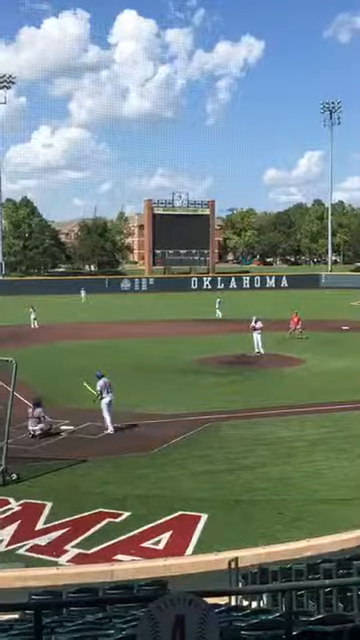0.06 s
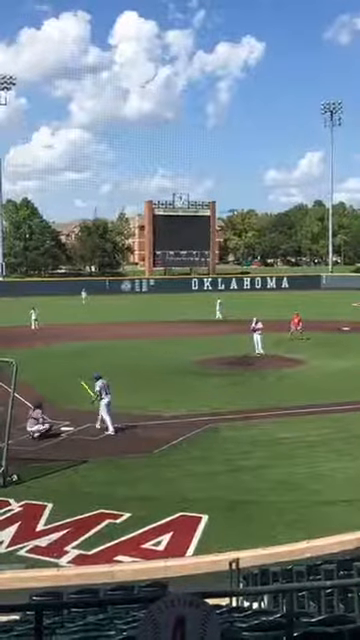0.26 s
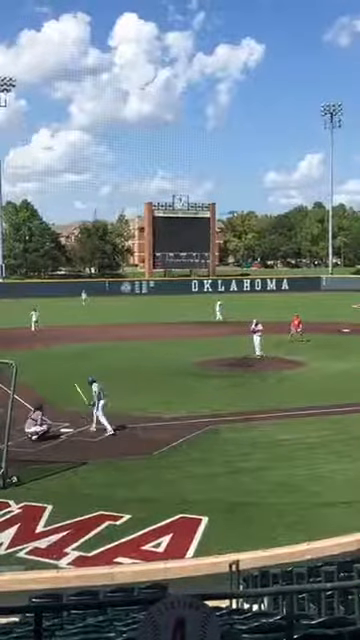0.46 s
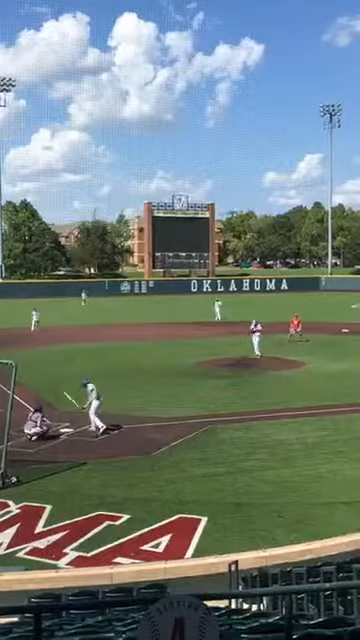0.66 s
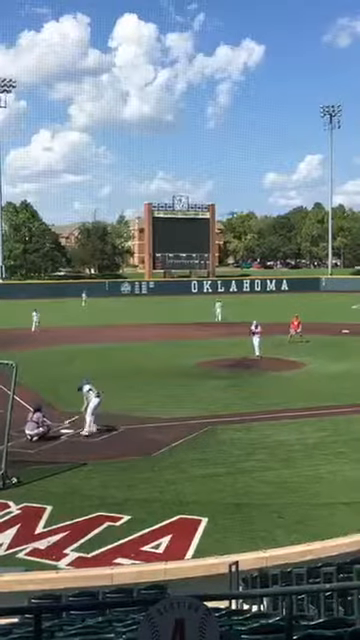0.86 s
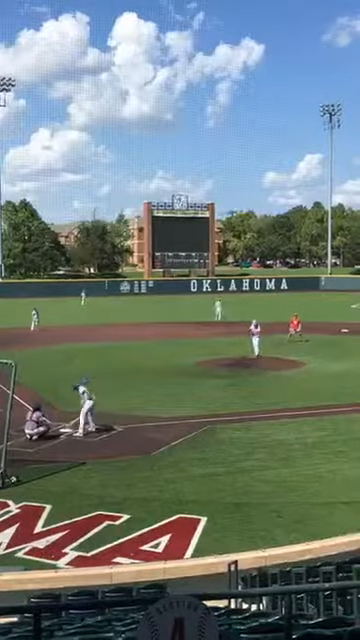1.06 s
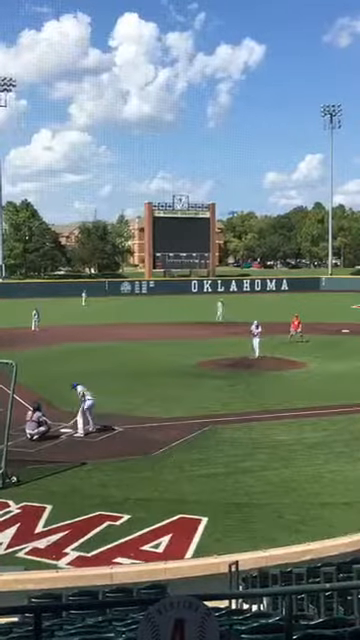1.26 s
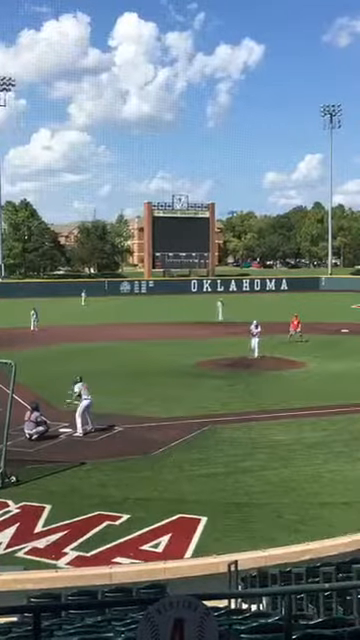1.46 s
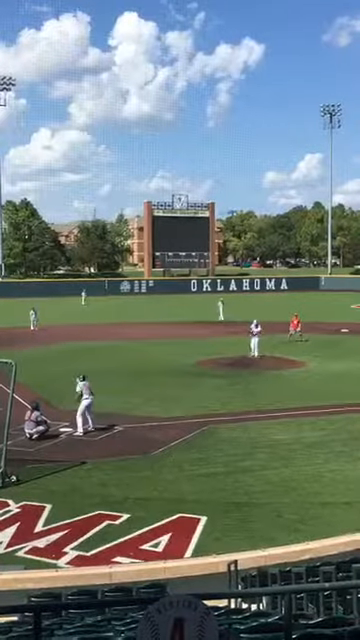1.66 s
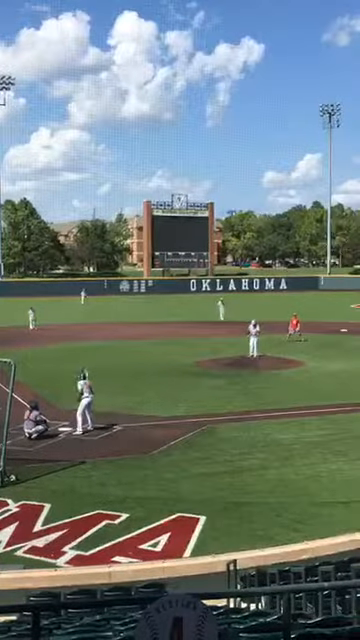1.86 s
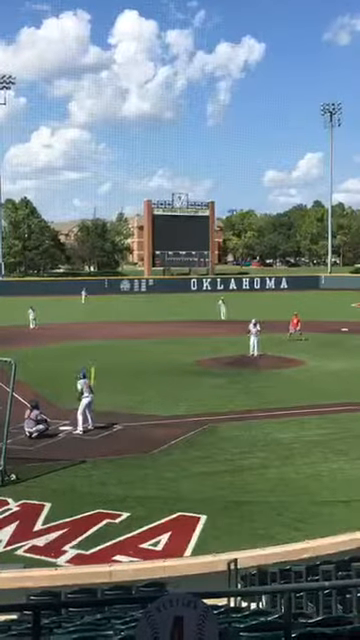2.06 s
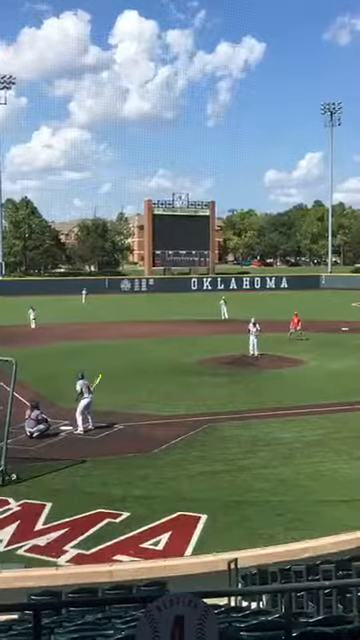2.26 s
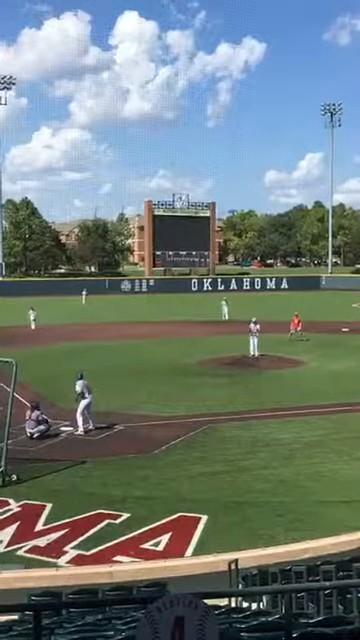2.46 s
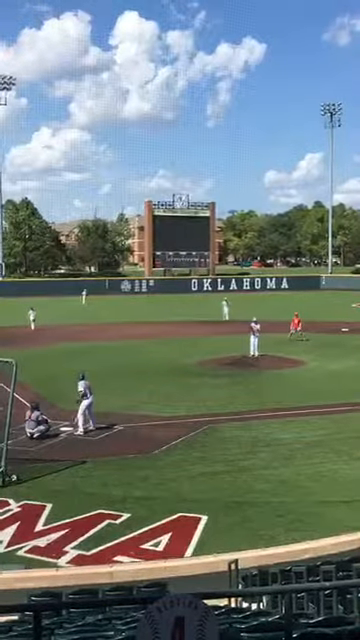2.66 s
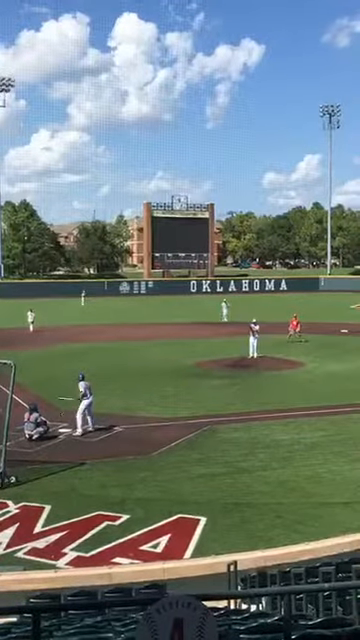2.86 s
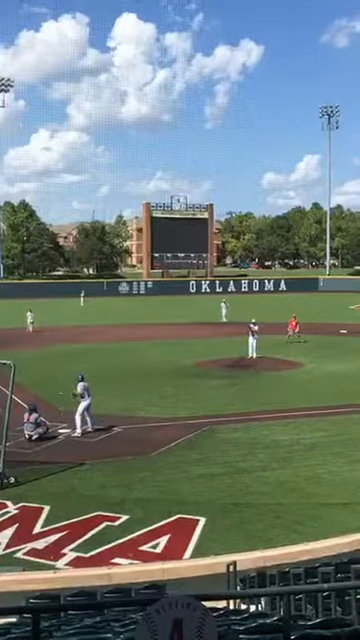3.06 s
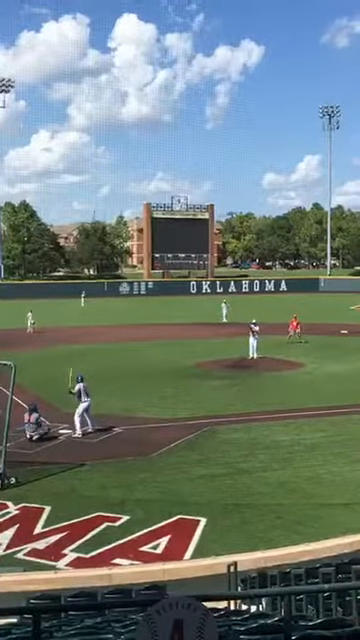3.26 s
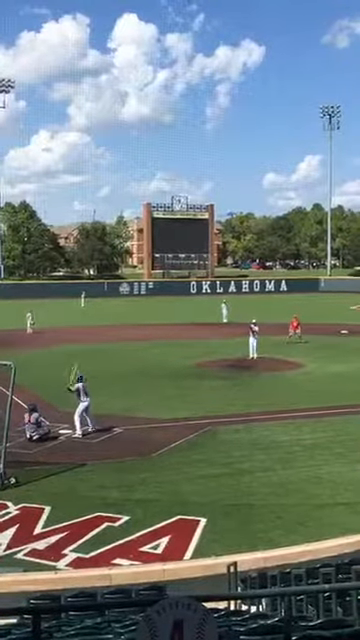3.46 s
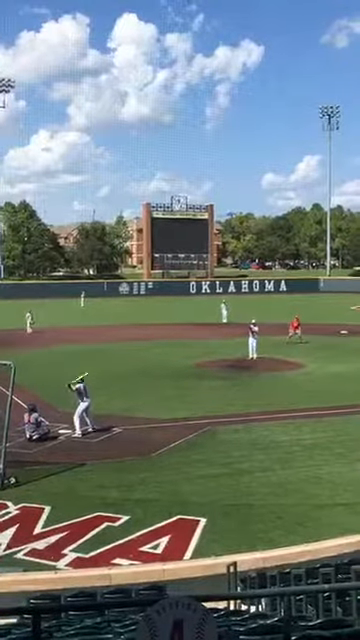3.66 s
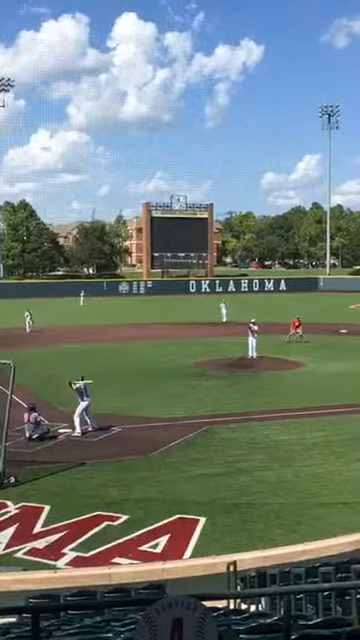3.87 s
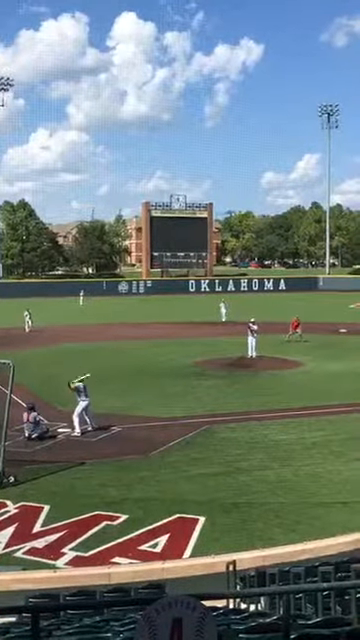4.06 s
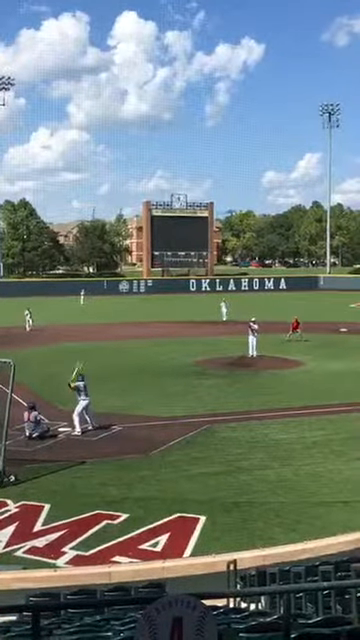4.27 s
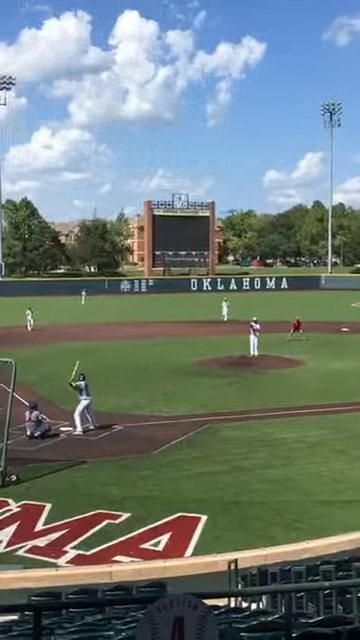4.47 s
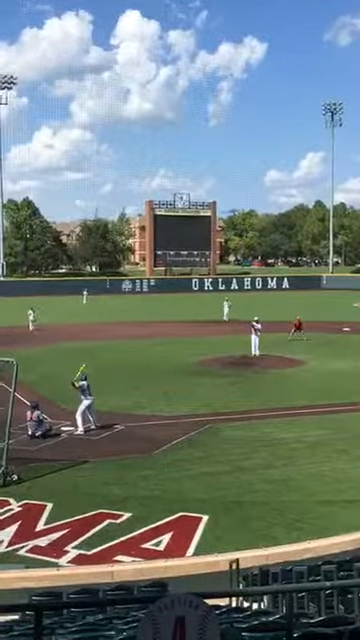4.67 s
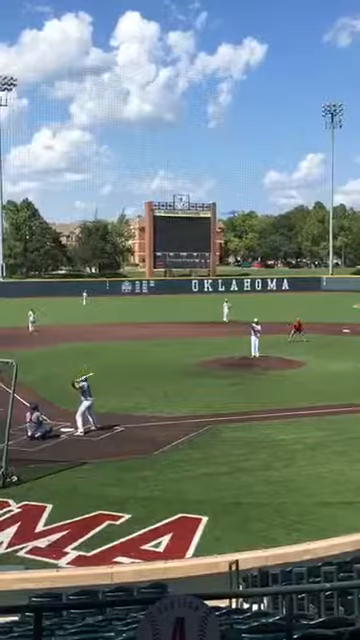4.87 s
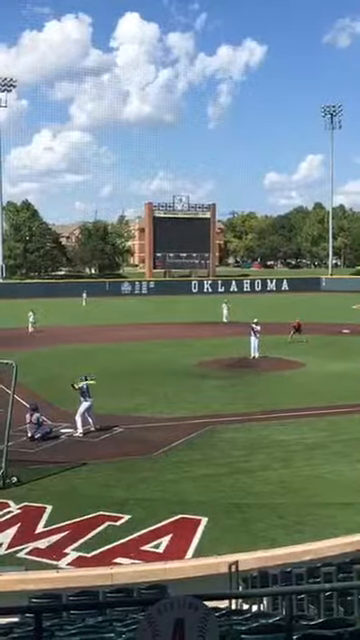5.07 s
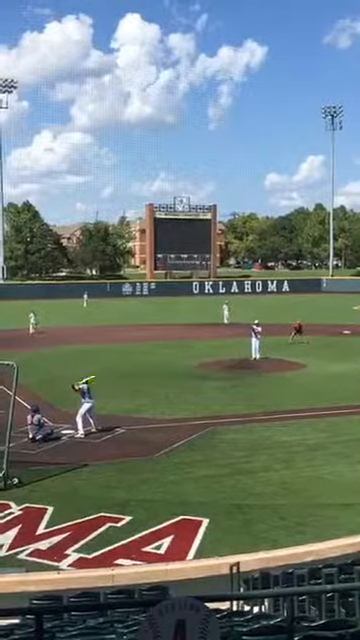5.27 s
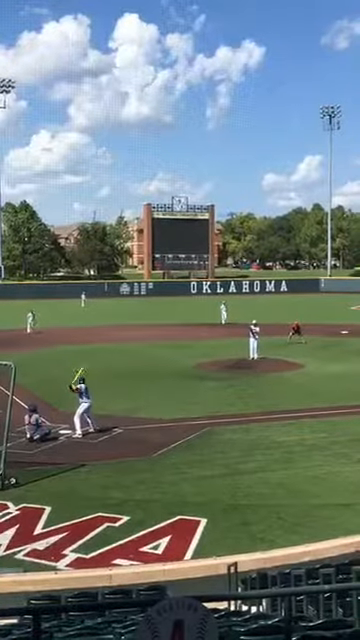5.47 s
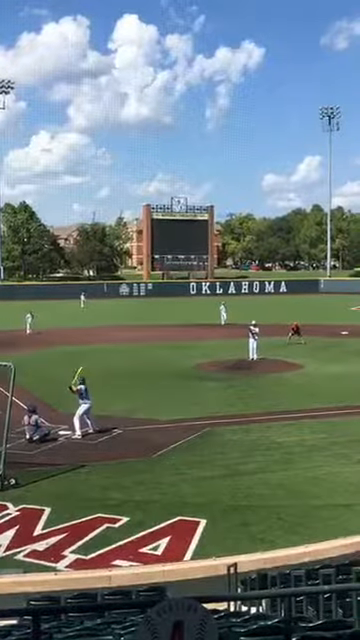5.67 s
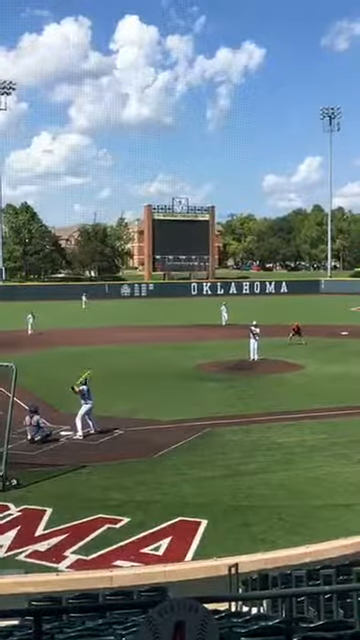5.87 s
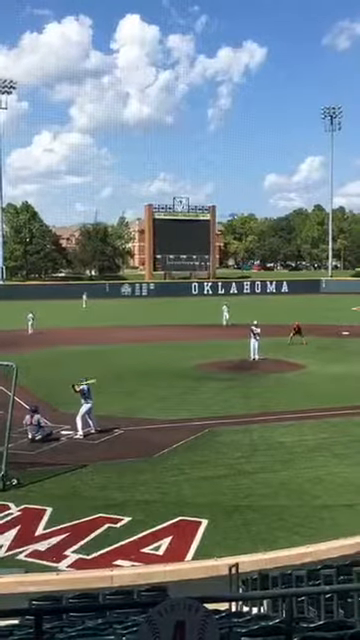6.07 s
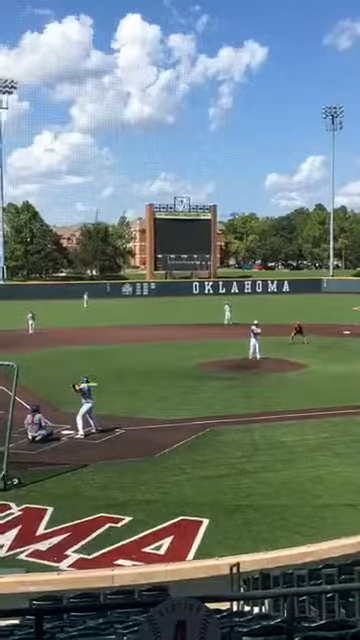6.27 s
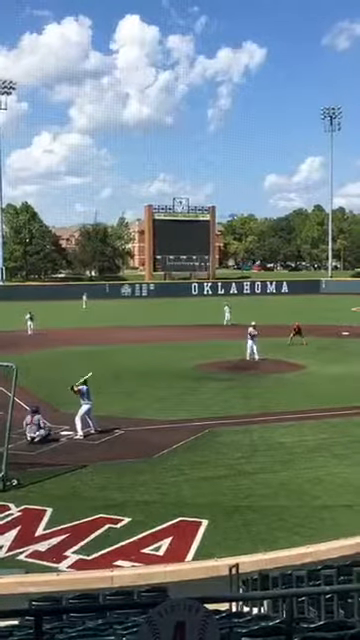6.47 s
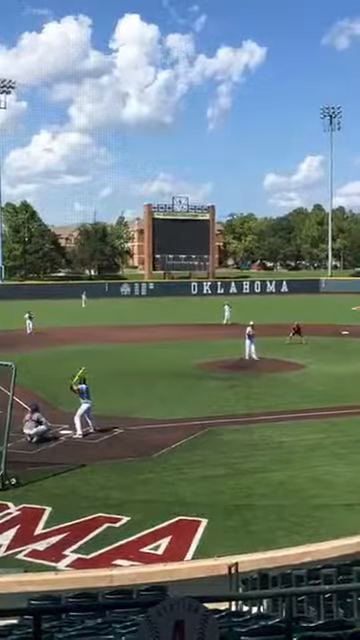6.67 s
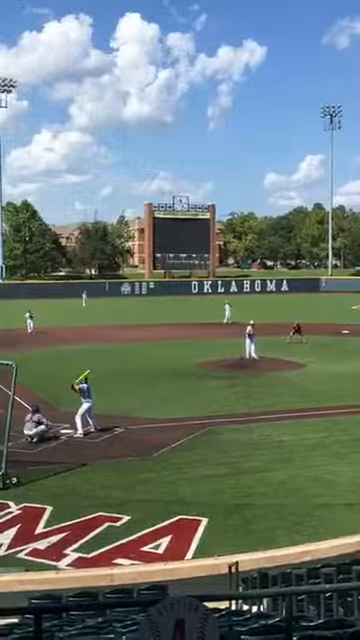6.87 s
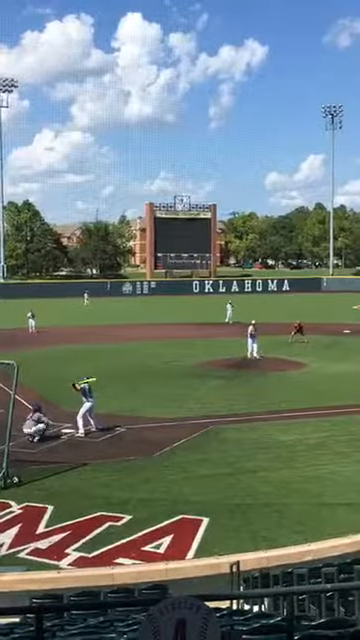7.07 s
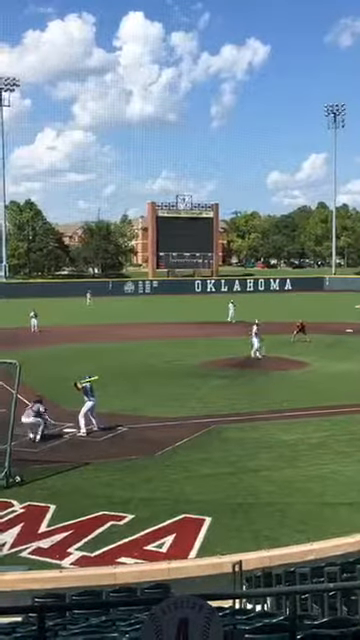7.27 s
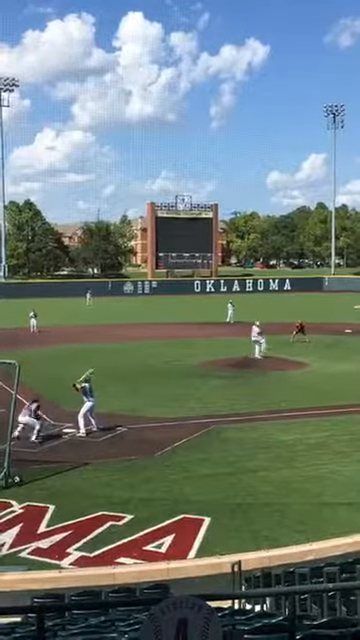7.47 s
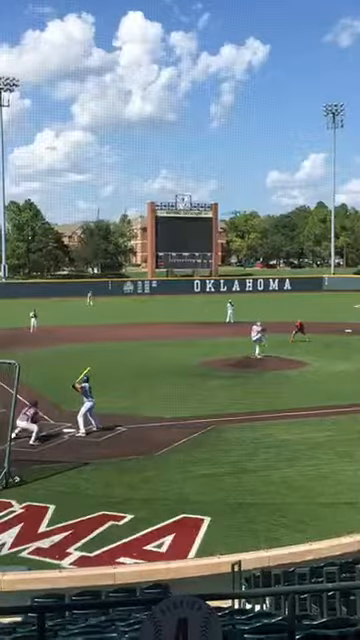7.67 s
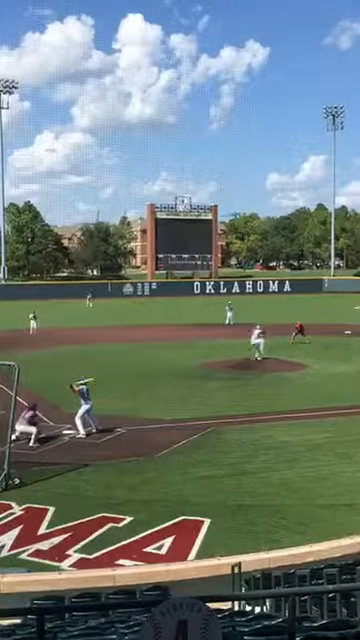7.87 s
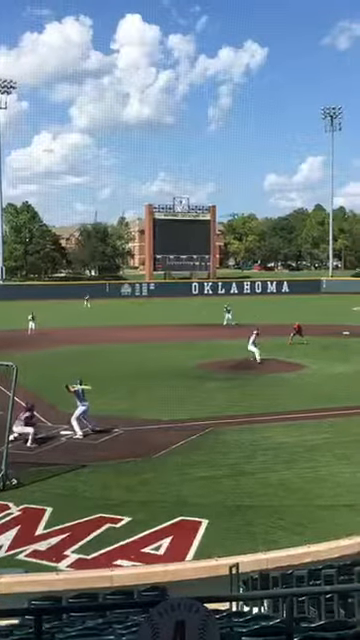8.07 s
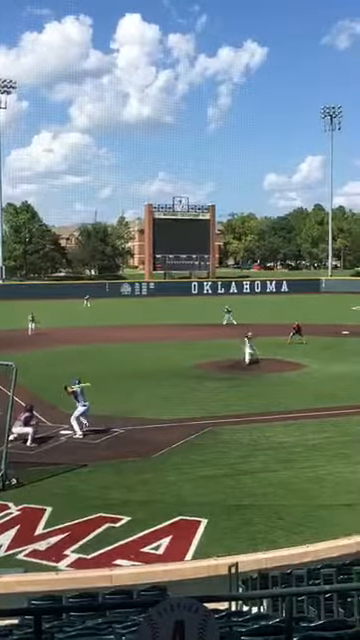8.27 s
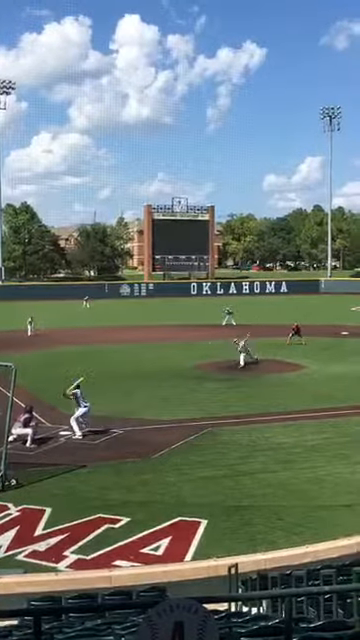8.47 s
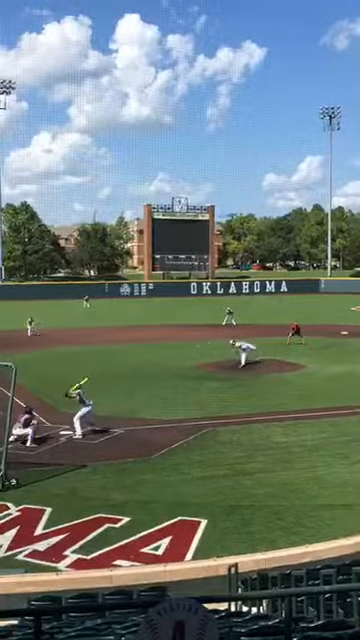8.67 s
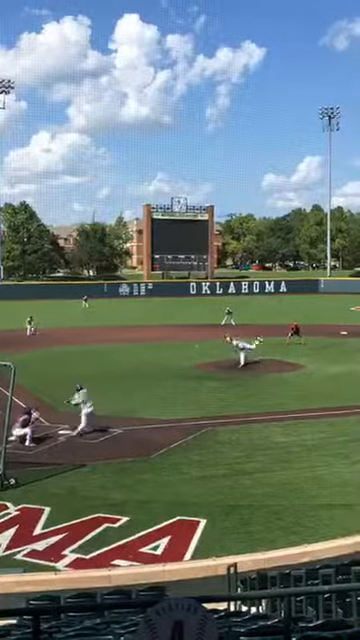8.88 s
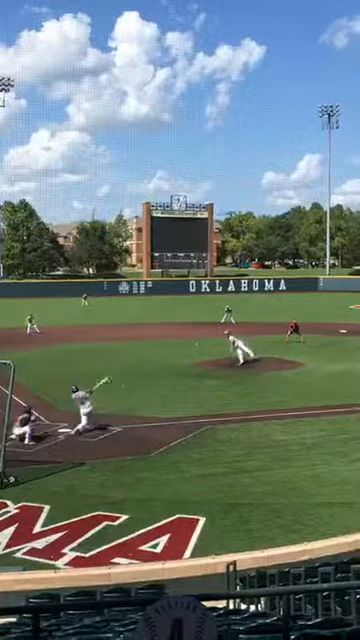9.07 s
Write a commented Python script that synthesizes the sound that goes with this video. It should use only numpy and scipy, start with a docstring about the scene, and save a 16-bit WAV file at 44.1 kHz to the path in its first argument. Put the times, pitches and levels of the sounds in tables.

```python
"""A metal bat meets the pitch at the end of a quiet stretch in a ballpark, heard from the stands.
The ball cracks on the barrel, the barrel pings, and the seats and walls throw the crack back.
Before it, small birds whistle thinly, shoes scuff, faint shuffles come from the field,
and a seat hinge sticks and slips in a creak, followed by two dull thumps on the seating.
Underneath lies a bed of distant town rumble and humming machinery."""
import sys
import numpy as np
from scipy import signal
from scipy.fft import rfft, irfft
from scipy.io import wavfile
from scipy.ndimage import uniform_filter1d

SR = 44100
rng = np.random.default_rng(int(sys.argv[2]) if len(sys.argv) > 2 else 0)


def to_wav(s):
    """Save 16-bit WAV."""
    ch = np.atleast_2d(s).T  # columns
    pcm = np.round(np.clip(ch, -1, 1) * 32767)  # PCM
    wavfile.write(sys.argv[1], SR, pcm.astype(np.int16))


N = 402633
HIT_S = 9.0435

# colour of the town rumble and air: (frequency [Hz], relative density [dB])
TOWN_SPECTRUM = [(22, -31), (36, -9), (55, -2), (78, -3.5), (115, -9), (180, -15.5), (320, -21), (500, -28),
                 (660, -28), (950, -31.5), (2000, -38.5), (2800, -44), (4000, -46.5), (5000, -50.5),
                 (8000, -56.3), (9700, -58), (10900, -62.5), (15000, -64.5)]
# machinery tones: (frequency [Hz], relative level [dB])
HUM_TONES = [(45.7, -13.5), (57.1, 0), (91.4, -10), (137, -28.5), (279.9, -23), (364, -28.5),
             (446.8, -30.5), (786, -34)]
# swell and sag of the deep hum: (time [s], level [dB])
HUM_SWELL = [(0.0, -45.5), (0.05, -36), (0.22, -44.5), (0.71, -35.5), (1.05, -37.5), (1.14, -43),
             (2.83, -37), (3.03, -47), (3.28, -38.5), (5.31, -40.5), (5.56, -44.5), (6.72, -39),
             (7.09, -49.5), (7.27, -37), (7.79, -38.5), (7.92, -47.5), (8.02, -39), (9.0, -41.5)]
# shuffles on the field: (time [s], peak level [dB], band centre [Hz])
FIELD_RUSTLES = [(.22, -76, 10000), (.35, -72, 4000), (3.0, -77, 6000), (3.35, -71.5, 4300),
                 (3.63, -73, 5500), (6.22, -76, 5470), (7.44, -72, 4500), (7.65, -72, 6000),
                 (8.33, -71, 4000), (8.49, -75, 10000)]
# shoe scuffs and clicks: (time [s], peak level [dB], rise [s], t60 [s], band centre [Hz])
SHOE_SCUFFS = [(.52, -72, .002, .06, 6000), (.744, -66, .002, .05, 5500), (.858, -59.5, .002, 0.38, 2000),
               (.92, -60, .03, .6, 900), (1.345, -55, 0.065, 0.23, 1750), (3.69, -66, .005, .12, 4000),
               (5.91, -60.5, 0.0068, 0.14, 5000), (5.912, -56, .0006, .014, 6000),
               (7.87, -65, .01, .1, 2600), (8.71, -62.5, 0.02, 0.42, 5400)]
# near bird notes: (time [s], length [s], start [Hz], middle [Hz], end [Hz], level [dB], rasp [0-1])
BIRD_CHIRPS = [(.35, 0.11, 9150, 9000, 8900, -79, .1), (.43, .08, 8700, 7600, 7000, -75, 1),
               (.75, .085, 6450, 6300, 7100, -74, 0.2), (.85, .16, 7550, 7700, 7800, -76, .3),
               (.905, .04, 7100, 6900, 6600, -72, .4), (1.66, 0.13, 6800, 7250, 7900, -78, .9),
               (4.06, .17, 5700, 5720, 5950, -74, .15), (4.1, .07, 7300, 7050, 7250, -76, .2),
               (4.187, .058, 6600, 8900, 6200, -74, .3), (4.24, 0.075, 5850, 6400, 7200, -60.5, 0.23),
               (4.318, 0.066, 7100, 8740, 9000, -71, .2), (4.46, .058, 6900, 8000, 7700, -76, .2),
               (4.522, .06, 7800, 8050, 7700, -78, .3), (4.93, 0.19, 5900, 6100, 6320, -75, .2),
               (4.96, .06, 6600, 7200, 8000, -82, .4), (5.195, .07, 5750, 5800, 6000, -77, .35),
               (5.689, .011, 4600, 5800, 7100, -66, .1), (5.7, .078, 6500, 7650, 8550, -65, .15),
               (5.772, .058, 8350, 8200, 8800, -66, .1), (5.82, .095, 6200, 7300, 8100, -72, 0.96),
               (5.935, 0.066, 7950, 7700, 7950, -72, .3), (6.6, .06, 6900, 7000, 7400, -71.5, 0.94),
               (6.635, 0.097, 7940, 7940, 8000, -70, .7), (6.89, 0.11, 8300, 7800, 7150, -72.5, .3),
               (7.1, .15, 7150, 7250, 7500, -82, .3)]
# high, slightly falling contact calls: (time [s], length [s], level [dB])
CONTACT_CALLS = [(1.568, .09, -74), (2.56, .09, -80), (3.46, .17, -80), (5.01, 0.055, -75.5),
                 (5.128, 0.15, -80), (6.55, .08, -77), (7.45, .04, -76), (8.528, .05, -77),
                 (8.81, 0.11, -75.5)]
# bird trills: (time [s], length [s], top pitch [Hz], fall [Hz], final level [dB], rasp [0-1])
BIRD_TRILLS = [(1.016, .12, 7650, 800, -67.5, .6), (7.825, .25, 8520, 400, -68.5, .25)]
# squeaks, perhaps of a folding seat and a shoe:
# (time [s], length [s], start [Hz], middle [Hz], end [Hz], level [dB], rasp [0-1])
SQUEAK_NOTES = [(.85, .024, 1060, 1043, 1020, -54, .9), (.865, .042, 1050, 980, 890, -57, 1),
                (8.7, .07, 3360, 3330, 3320, -69, 0.15)]
# course of the hinge's held creak: (time [s], slip rate [Hz], level [dB])
CREAK_CURVE = [(.868, 227, -72), (.882, 225.5, -53.5), (.925, 222.5, -53), (.965, 226, -54),
               (.985, 230, -66)]
# resonances of the hinge: (frequency [Hz], gain [dB])
HINGE_RESPONSE = [(224, -35), (680, -10), (900, -11), (1300, -29), (1570, -17), (1790, 1), (2015, -19),
                  (2240, -26), (2465, -19), (2690, -20), (3100, -27), (4500, -29)]
# soft blows on the seating: (time [s], level [dB])
SEAT_THUMPS = [(.985, -31), (1.195, -37)]
# boom of the seating: (frequency [Hz], relative level [dB], t60 [s])
SEATING_MODES = [(88, 1, .22), (128, -4, 0.15), (186, -7, .14)]
# colour of the ball's crack: (frequency [Hz], relative density [dB])
CRACK_SPECTRUM = [(100, -16), (260, -12), (350, -11), (480, -22), (620, -32), (900, -15), (1400, -7),
                  (1900, -.5), (3300, 0.5), (3900, -12), (5000, -11.3), (8500, -20.5), (11000, -26),
                  (15000, -35)]
# short-lived clank of the bat: (frequency [Hz], level [dB], t60 [s])
CLANK_MODES = [(1068, -9, 0.04), (1127, -11.5, .043), (1230, -21.5, .048), (1270, -17, 0.01),
               (1795, -15, .016), (2030, -17.5, .014), (2380, -22, 0.015), (2900, -20, .009),
               (3120, -18, .011), (3400, -18.5, .026), (3860, -30, .008), (5000, -18, 0.0057),
               (6380, -22.5, .008), (8400, -30, .008)]
# slapback from seats and walls: (delay [s], gain [dB])
HIT_ECHOES = [(.00305, -9.1), (0.0124, -16), (.01627, -15.9), (.01898, -18), (.0407, -25), (0.0516, -20),
              (0.0549, -19), (.06845, -19), (.07278, -23), (.08013, -21)]
# the barrel's two lasting modes: (frequency [Hz], level [dB], t60 [s])
PING_MODES = [(1409, -34, .25), (2580, -30.3, 0.14)]
# paths of the ping, direct and off the backstop: (delay [s], gain [dB])
PING_ARRIVALS = [(0, -4.5), (0.0292, 2.5), (0.0459, -.2)]


def undb(db):
    """Decibels to gain."""
    return 10 ** (np.asarray(db) / 20)


def unit(x):
    """Scale to an rms of 1."""
    return x / np.sqrt(np.mean(x ** 2))


def add(out, x, s):
    """Mix x into out from time s."""
    i = max(int(s * SR), 0)
    x = x[:max(len(out) - i, 0)]
    out[i:i + len(x)] += x


def drift(rate_hz, size=N):
    """Smooth random modulation with a spread near 1."""
    hold = int(SR / rate_hz)
    steps = np.repeat(rng.standard_normal(size // hold + 1), hold)
    return np.sqrt(2) * uniform_filter1d(uniform_filter1d(steps, hold), hold)[:size]


def eq_curve(spectrum, size):
    """Gain of a spectrum table at each frequency bin."""
    hz, db = np.transpose(spectrum)
    bins = np.fft.rfftfreq(size, 1 / SR)
    return undb(np.interp(np.log(bins + 1), np.log(hz), db))


def fade(t, t60):
    """Decay by 60 dB in t60 seconds."""
    return np.exp(-np.log(1000) * t / t60)


def modes(table, t):
    """Decaying resonances, struck together."""
    return sum(undb(db) * fade(t, t60) * np.sin(2 * np.pi * hz * t) for hz, db, t60 in table)


def stands(x, wet_db, t60, build_s):
    """The dry sound plus the dense tail that rows of seats scatter from it."""
    t = np.arange(SR) / SR
    tail = rng.standard_normal(SR) * fade(t, t60) * (1 - np.exp(-t / build_s))
    return x + undb(wet_db) * signal.fftconvolve(x, tail / np.linalg.norm(tail))[:len(x)]


def town(level_db=-45.0):
    """A nearly steady bed of distant rumble and air."""
    drift_db = .3 * drift(1.2) + .4 * drift(9)
    rumble = irfft(rfft(rng.standard_normal(N)) * eq_curve(TOWN_SPECTRUM, N), N)
    return unit(rumble) * undb(level_db + drift_db)


def machinery(deep_trim_db=0.6, upper_db=-40.0, waver_db=1.0, phase_drift=0.17):
    """Distant plant hums in tones that beat together and waver in the open air."""
    t = np.arange(N) / SR
    swell_db = deep_trim_db + np.interp(t, *np.transpose(HUM_SWELL))
    out = np.zeros(N)
    for hz, db in HUM_TONES:
        phase = 2 * np.pi * (hz * t + rng.random())
        phase += phase_drift * np.sqrt(hz / HUM_TONES[0][0]) * drift(2.99)
        level_db = swell_db if hz < 80 else upper_db  # only the deepest tones swell and sag
        out += np.sqrt(2) * undb(level_db + db + waver_db * drift(3.99)) * np.sin(phase)
    return out


def friction(s, db, rise_s, t60, centre_hz, octaves, lead_s=.5):
    """Rubbing makes a band of pink noise that swells to its peak at time s and dies away."""
    out, t = np.zeros(N), np.arange(SR) / SR - lead_s
    hz = np.fft.rfftfreq(SR, 1 / SR) + 1
    band = np.exp(-.5 * (np.log2(hz / centre_hz) / octaves) ** 2)
    grit = unit(irfft(rfft(rng.standard_normal(SR)) * band / np.sqrt(hz)))
    swell = np.exp(np.minimum(t, 0) / rise_s) * fade(np.maximum(t, 0), t60)
    add(out, undb(db) * grit * swell, s - lead_s)
    return out


def rustles():
    """Faint shuffles from the field, each a soft, narrow brush of friction."""
    return sum(friction(s, db, rise_s=.037, t60=.35, centre_hz=hz, octaves=.33)
               for s, db, hz in FIELD_RUSTLES)


def scuffs(air_hz=13000):
    """Shoes scrape on the ground, dulled a little by the air."""
    scrapes = sum(friction(*row, octaves=1.36) for row in SHOE_SCUFFS)
    return signal.sosfilt(signal.butter(4, air_hz, fs=SR, output="sos"), scrapes)


def whistles(notes, rasp_waver=.075, rasp_flutter_db=4, air_flicker_db=1.5):
    """Tones glide through three pitches, flickering in open air; rasp shakes pitch and level."""
    out = np.zeros(N)
    for s, length, first, middle, last, db, rasp in notes:
        size = int(length * SR)
        progress = np.linspace(0, 1, size)
        glide = np.polyval(np.polyfit([0, .5, 1], [first, middle, last], 2), progress)
        hz = glide * (1 + rasp * rasp_waver * drift(900, size))
        flutter_db = rasp * rasp_flutter_db * drift(200, size) + air_flicker_db * drift(68, size)
        swell = np.abs(np.sin(np.pi * progress ** 1.32)) ** .58  # peaks just past the middle
        tone = np.sqrt(2) * np.sin(2 * np.pi * np.cumsum(hz) / SR)
        add(out, undb(db + flutter_db) * swell * tone, s)
    return out


def twitter_notes(low_hz=5600, high_hz=8800, fall_hz=400, level_db=-86, rasp=.72, count=42):
    """Short raspy falling notes at random pitches, loosely spaced through the whole scene."""
    draws = rng.uniform([0, .05, low_hz, -2], [1, .15, high_hz, 2], (count, 4))
    slot_s = N / SR / count
    return [((i + late) * slot_s, length, hz, hz - fall_hz / 2, hz - fall_hz, level_db + off_db, rasp)
            for i, (late, length, hz, off_db) in enumerate(draws)]


def trill_notes(period_s=.0325, syllable_s=.023, growth_db_per_s=26):
    """Quick runs of falling syllables that grow louder, no two alike."""
    notes = []
    for s, length, top, fall, db, rasp in BIRD_TRILLS:
        for lag in np.arange(0, length, period_s):
            late_s, off_hz, off_db = rng.standard_normal(3) * [.002, 70, 2]
            hz = top + off_hz
            level_db = db + off_db - growth_db_per_s * (length - lag)
            notes.append((s + lag + late_s, syllable_s, hz, hz - fall / 3, hz - fall, level_db, rasp))
    return notes


def birds(near_trim_db=.3, call_glide_hz=(8650, 8400, 8150), call_rasp=.25):
    """Small birds chirp, call and trill nearby; fainter, wetter twitter sits further off."""
    calls = [(s, length, *call_glide_hz, db, call_rasp) for s, length, db in CONTACT_CALLS]
    near = stands(whistles(BIRD_CHIRPS + calls), wet_db=-6, t60=.46, build_s=.008)
    trills = stands(whistles(trill_notes()), wet_db=-8, t60=.4, build_s=.008)
    far = stands(whistles(twitter_notes()), wet_db=0, t60=.56, build_s=.005)
    return undb(near_trim_db) * near + trills + far


def creak(jitter=.003, harmonics=20):
    """The hinge sticks and slips at a near-steady rate; one overtone sits on its sharp resonance."""
    t = np.arange(N) / SR
    times, rates, levels = np.transpose(CREAK_CURVE)
    on = (t > times[0]) & (t < times[-1])
    slip_hz = np.interp(t[on], times, rates) * (1 + jitter * drift(300, on.sum()))
    slips = np.cumsum(slip_hz) / SR
    tone = 0
    for k in range(1, harmonics + 1):
        resonance = undb(np.interp(k * slip_hz, *np.transpose(HINGE_RESPONSE)))
        tone += resonance * np.sin(2 * np.pi * k * slips)
    out = np.zeros(N)
    out[on] = np.sqrt(2) * undb(np.interp(t[on], times, levels)) * tone
    return out


def squeaks():
    """Short squeaks and the hinge's held creak ring on in the stands."""
    return stands(whistles(SQUEAK_NOTES) + creak(), wet_db=-8, t60=.84, build_s=.01)


def thumps(attack_s=.015):
    """Soft blows set the seating booming briefly."""
    out, t = np.zeros(N), np.arange(SR) / SR
    boom = modes(SEATING_MODES, t) * (1 - np.exp(-(t / attack_s) ** 2))
    for s, db in SEAT_THUMPS:
        add(out, undb(db) * boom, s)
    return out


def ball_crack(size=1024):
    """The ball's contact: the sharpest causal click of its colour, with unit energy."""
    cepstrum = irfft(np.log(eq_curve(CRACK_SPECTRUM, size)))
    # minimum phase packs the energy into the attack
    cepstrum[1:size // 2] *= 2
    cepstrum[size // 2 + 1:] = 0
    click = irfft(np.exp(rfft(cepstrum)))
    return click / np.linalg.norm(click)


def barrel_clank(t, contact_s=.00022, low_cut_hz=800):
    """The bat's short-lived modes, lean in the bass: a thin barrel radiates long waves poorly."""
    ring = modes(CLANK_MODES, t) * (1 - np.exp(-(t / contact_s) ** 2))
    return signal.sosfilt(signal.butter(6, low_cut_hz, "high", fs=SR, output="sos"), ring)


def barrel_ping(t, attack_s=.0035, flutter_db=2):
    """Two modes of the tube outlast the clank, with a rough flutter."""
    ring = modes(PING_MODES, t) * (1 - np.exp(-t / attack_s))
    return ring * undb(flutter_db * drift(450, len(t)))


def bat_hit(crack_db=-5.5, grit_db=-13, clank_lag_s=.0001, echo_crack_db=-5):
    """The ball cracks on the barrel, which rings as the ball leaves; the stands answer."""
    out, t = np.zeros(N), np.arange(SR) / SR
    clank = barrel_clank(t)
    # one sharp push, then a few milliseconds of rattle
    click = undb(crack_db) * ball_crack()
    push = -np.pad(click, (0, SR - len(click)))
    grit = undb(grit_db) * rng.standard_normal(SR) * fade(t, t60=.022)
    add(out, signal.fftconvolve(grit, click), HIT_S)
    # the ground and backstop scatter the crack at once, the seats for longer
    add(out, stands(push, wet_db=.5, t60=.07, build_s=.003), HIT_S)
    add(out, stands(push, wet_db=2.3, t60=.6, build_s=.004) - push, HIT_S)  # tail only
    add(out, stands(clank, wet_db=-17, t60=.64, build_s=.03), HIT_S + clank_lag_s)
    for delay, db in HIT_ECHOES:
        add(out, undb(db) * clank, HIT_S + clank_lag_s + delay)
        add(out, undb(db + echo_crack_db) * push, HIT_S + delay)
    ping = barrel_ping(t)
    for delay, db in PING_ARRIVALS:
        add(out, undb(db) * ping, HIT_S + delay)
    return out


def scene():
    """The bat hit over the ballpark's bed and small sounds, mixed in mono."""
    return (bat_hit() + town() + machinery() + birds() + scuffs() + thumps() + rustles() + squeaks())[None]


def record(dry):
    """The phone cuts the top treble steeply."""
    top_hz = 15350
    return signal.sosfilt(signal.ellip(10, .1, 80, top_hz, fs=SR, output="sos"), dry)


dry = scene()
out = record(dry)
to_wav(out)
```